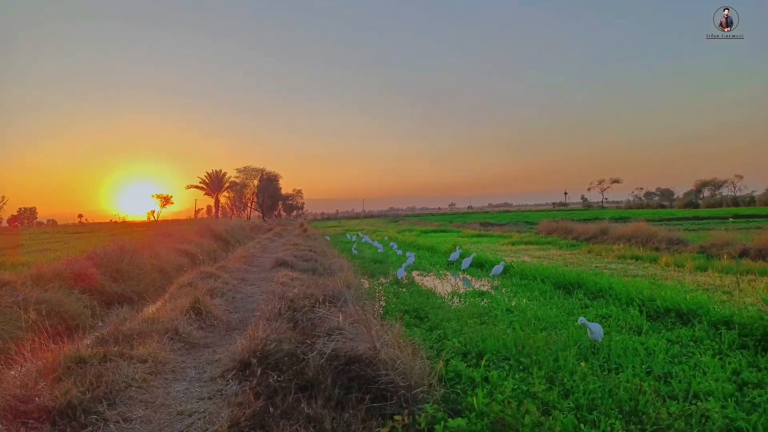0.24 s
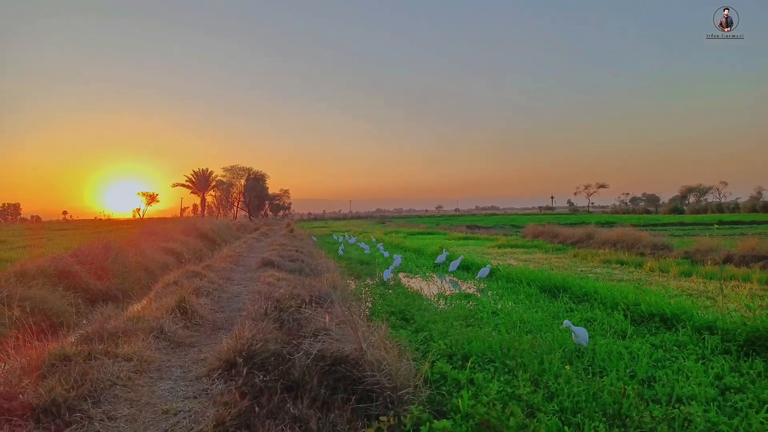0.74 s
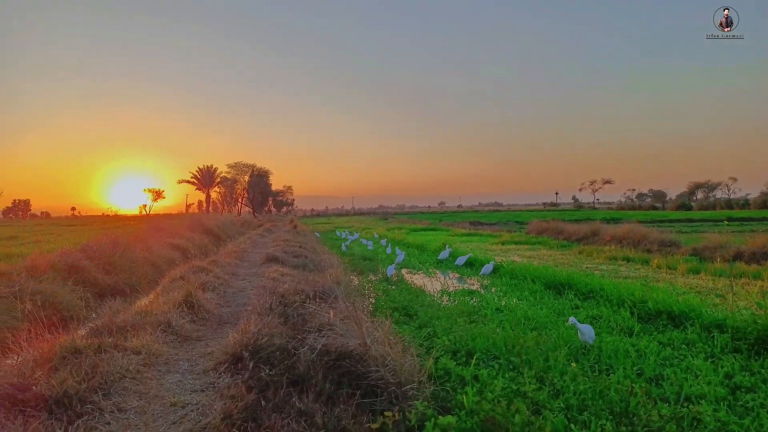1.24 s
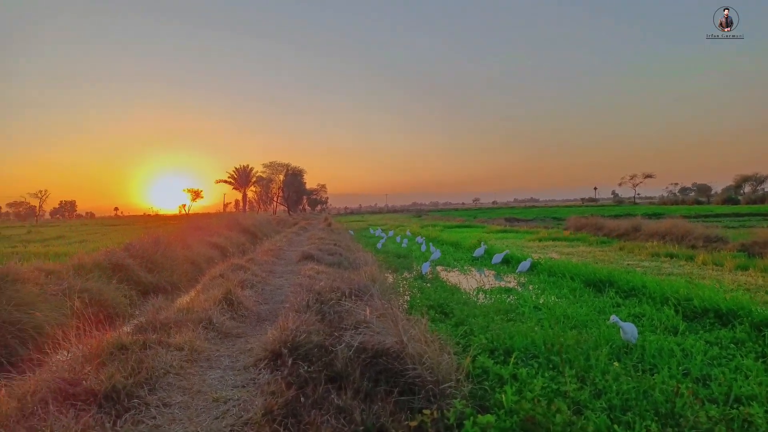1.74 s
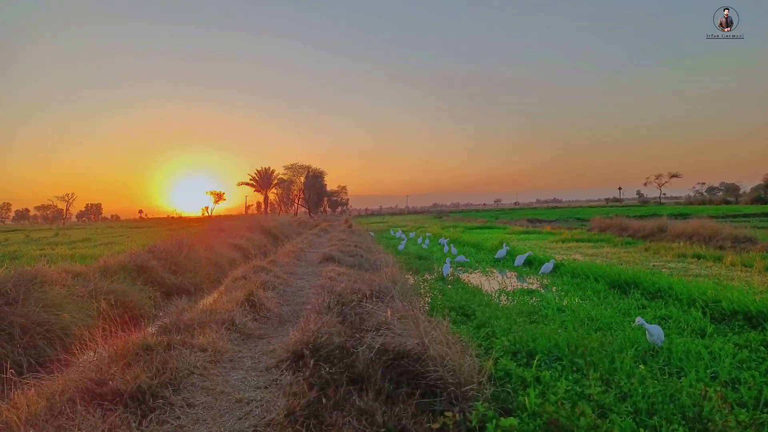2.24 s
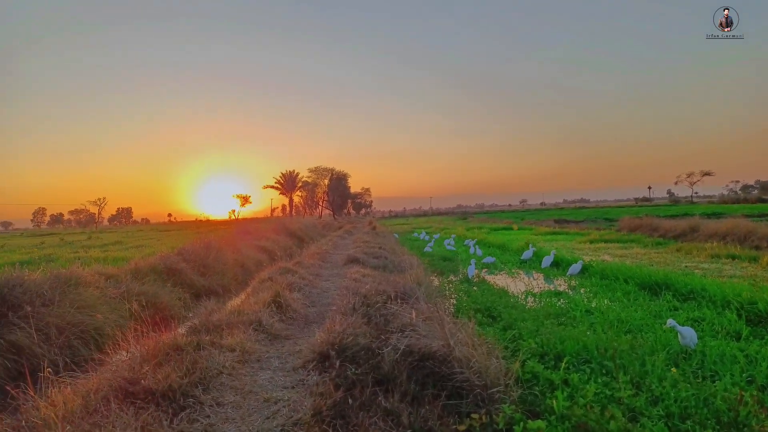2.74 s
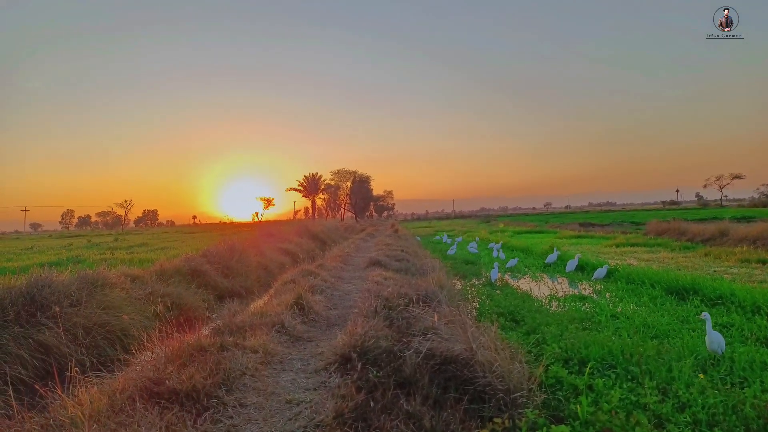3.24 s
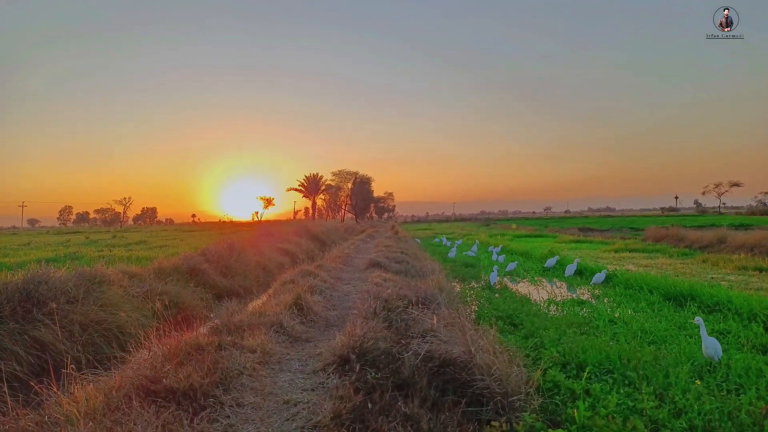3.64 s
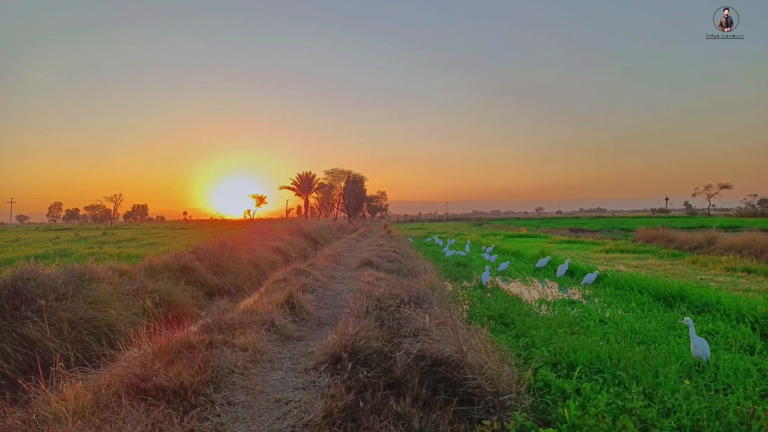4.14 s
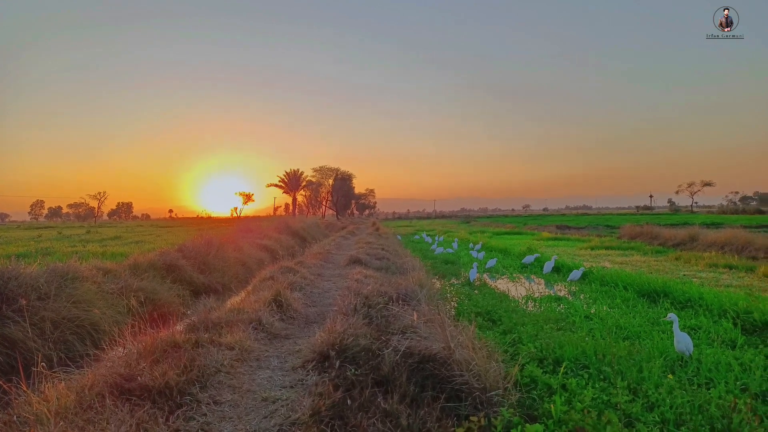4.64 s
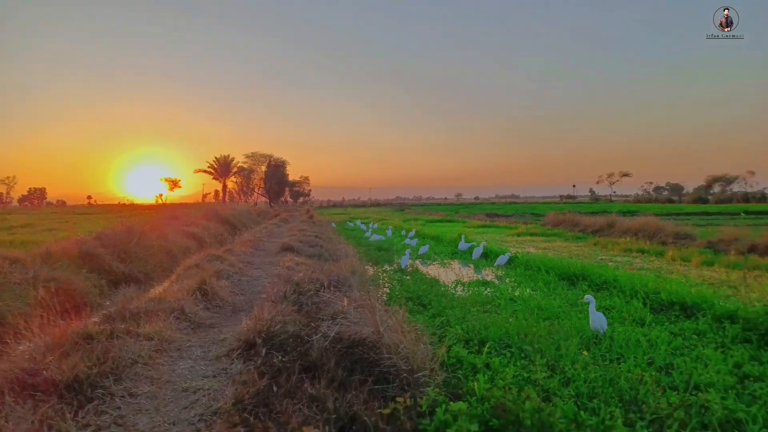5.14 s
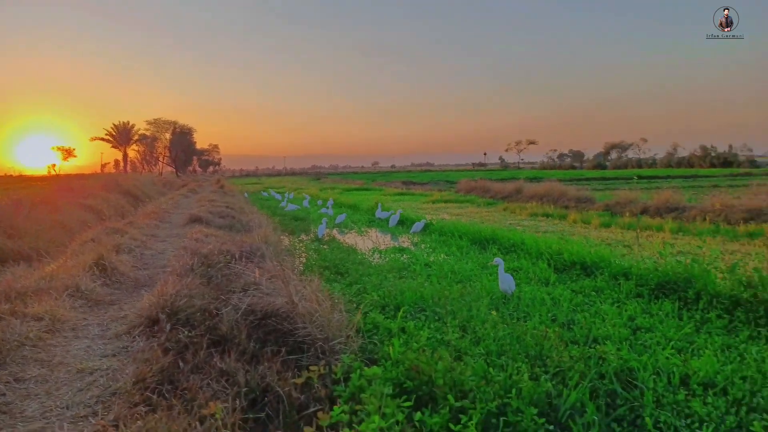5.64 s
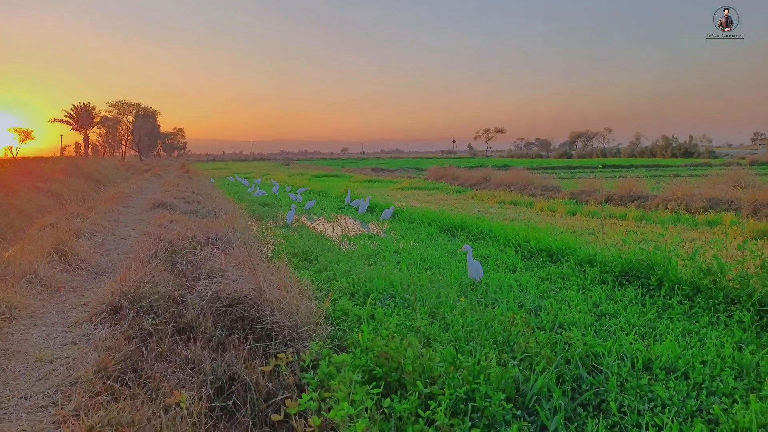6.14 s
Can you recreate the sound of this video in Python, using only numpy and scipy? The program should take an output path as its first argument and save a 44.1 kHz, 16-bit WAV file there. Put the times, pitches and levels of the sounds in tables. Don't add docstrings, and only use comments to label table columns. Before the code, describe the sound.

From 0 s two single-cylinder diesel pump engines run continuously outdoors. The nearer fires about 7.8 times a second: short, bright bursts of gas around 2-4 kHz, each ringing pipe and tin cowl, with a slight low push and a brief metallic tail filling the gap. The other beats about 9 times a second, a dull low thump with small valve clacks, so the two rhythms slide past each other. Puffs vary; a strong one lands at 0.06 s, the sound skips for an instant at 1.13 s, one firing nearly misses at 1.36 s, and a very strong puff with a tin clank comes near 1.49 s. Loose tin rattles and pump rumble stay low beneath. From about 5 s the phone turns, the ring sinks and dulls, and gurgling water swells around 5.8 s. A barely audible grass swish passes at 6.1 s; engines continue to the end, about 6.4 s.

```python
import sys
import numpy as np
from scipy import signal
from scipy.fft import rfft, irfft, next_fast_len
from scipy.io import wavfile
from scipy.ndimage import uniform_filter1d

SR = 44100
rng = np.random.default_rng(int(sys.argv[2]) if len(sys.argv) > 2 else 0)


def undo_db(level):
    steps = np.asarray(level, float) / 20
    return 10 ** steps


def transcribe(u):
    v = np.clip(np.atleast_2d(u).T, -1, 1)
    q = np.round(v * 32767).astype(np.int16)
    wavfile.write(sys.argv[1], SR, q)


N = 280917

# pitch in Hz, width in Hz, level in dB.
COWL_MODES = [(1080, 360, -39), (1407, 110, -2.5), (1730, 32, 1), (1950, 40, 1.5), (2610, 56, 4),
              (2870, 280, -15.5), (3840, 810, -12.5), (4400, 61, -52), (5470, 63, -14), (6400, 71, -53)]
# time in seconds, water level in dB, left minus right in dB.
PHONE_PATH = [(0, -87, 3.5), (.5, -77, 2.5), (1.402, -80, 4.5), (2.199, -87.5, 3.5), (2.899, -72, 4.5),
              (3.6, -83.5, 6), (4.3, -75.5, 6), (5, -79, 1), (5.4, -74, 4), (5.6, -66.5, 3.5),
              (5.802, -56, 1.5), (6.25, -65, -2), (6.5, -64, -0.5)]


def near_engine():
    bright, low, t = np.zeros((2, N)), np.zeros(N), np.arange(5120) / SR
    eddy_hz = np.arange(900, 9000, 220)
    for s, peak_db, ring_hz, upper_hz, treble_db, tail_db in firings():
        noise = rng.standard_normal((3, len(t)))
        eddies = np.c_[eddy_hz, 3.3 * rng.standard_normal(len(eddy_hz))]
        gas = gas_noise(noise, treble_db)
        blast = np.exp(-((t - .0093) / 0.0031) ** 2 / 2) + 0.27 * swell(t - .004, 0.0045, 0.0048)
        blast = blast * patchy(len(t), count=70, db=2.5)
        puff = exhaust_puff(gas, eddies, blast, ring_hz, upper_hz)
        tail = dull(0.04 * echo(t, gas, eddies) + 0.25 * cowl(t, ring_hz)) + panels(t)
        sound = 1.88 * puff + undo_db(tail_db) * tail + bare_jet(noise[1], blast, s)
        waver = int(2.2 * rng.standard_normal()) - 1
        sound[1] = np.roll(sound[1], waver)
        add(bright, s - .005, sound * undo_db(peak_db))
        push_db = 0.43 * (peak_db + 28.0) + 2.56 * rng.standard_normal()
        add(low, s - .005, exhaust_push(t) * undo_db(push_db))
    return bright, low


def firings():
    # firing number, time in seconds.
    near_beat = [(0, .0605), (3, .4468), (8, 1.0885), (9, 1.2303), (10, 1.3593), (11, 1.4918), (15, 2.0077),
                 (24, 3.161), (32, 4.1769), (34, 4.4271), (42, 5.449), (49, 6.3485)]
    # time in seconds, pitch in Hz.
    ring_path = [
        (0, 2697),
        (4.7, 2673),
        (5.2, 2366),
        (6.4, 2130),
    ]
    # time in seconds, peak in dB, pipe ring in Hz, treble share in dB.
    odd_firings = [(0.0612, -24, 2600, -14), (.1887, -33.5, 1685, -10.5), (0.3168, -27.5, 1874, -4),
                   (0.4458, -33, 2610, -0.5), (0.5731, -30.5, 2734, -8.5), (0.7012, -30, 2780, -13.5),
                   (0.8331, -35, 2750, -9), (1.0872, -31.5, 2800, -14), (1.2297, -30, 2900, -9.5),
                   (1.3579, -57, 1720, -14), (1.4906, -21.5, 2790, -4.5), (1.6195, -33, 2700, -3),
                   (1.7481, -27, 2756, -12.5), (2.0066, -26.5, 2500, -12), (2.2639, -27, 2850, -3.5),
                   (2.3902, -31.5, 2850, -7), (2.5196, -29.5, 2916, -28), (2.6478, -29.5, 2830, -12.5),
                   (2.7753, -30.5, 2056, -15), (3.2871, -28, 2574, -18), (4.1757, -25, 2600, -19),
                   (4.3007, -30.5, 1950, -17.5), (4.4268, -34, 2930, -20.5), (4.81, -32, 2190, -24),
                   (4.9366, -38.5, 3080, -8.5), (5.3223, -33.5, 2200, -9.5), (5.8324, -34, 2280, -16),
                   (5.9614, -27.5, 2160, -19), (6.219, -35, 2295, -7.5), (6.3488, -28.5, 2300, -10.5)]
    usual_db = -29
    times = beat_times(near_beat)
    chance = rng.standard_normal((5, len(times)))
    peak_db = usual_db + 0.38 * chance[0]
    ring_hz = np.interp(times, *np.transpose(ring_path)) * (1 + .03 * chance[1])
    upper_hz = 3564 * np.exp(0.14 * chance[2])
    treble_db = -15.5 + 4.5 * chance[3]
    rows = with_odd_beats(np.c_[times, peak_db, ring_hz, treble_db], odd_firings)
    s, peak_db, ring_hz, treble_db = rows.T
    tail_db = -4.5 - 0.61 * (peak_db - usual_db) + 1.9 * chance[4]
    return np.c_[s, peak_db, ring_hz, upper_hz, treble_db, tail_db]


def gas_noise(noise, treble_db):
    # frequency in Hz, level in dB per Hz.
    gas_colour = [(210, -70), (350, -38), (571, -63), (768, -14), (994, -19), (1540, -10.5), (1820, -6.5),
                  (2580, -3.5), (2970, -4), (3380, -8.5), (4260, -6), (5810, -12.5), (7610, -35),
                  (9890, -71), (16700, -120)]
    gas = colour(noise[0] + .25 * noise[1:], gas_colour)
    return gas + (undo_db(treble_db + 9.0) - 1) * band(gas, 6500, 4200)


def small_jet(x):
    return signal.sosfilt(signal.butter(5, [1100, 8300], "band", fs=SR, output="sos"), x)


def exhaust_puff(gas, eddies, blast, ring_hz, upper_hz):
    puff = small_jet(unit(colour(gas, eddies)) * blast)
    steep_top = signal.butter(8, 6620, fs=SR, output="sos")
    puff = signal.sosfilt(steep_top, puff) + undo_db(-21) * puff
    puff = puff + 2.44 * band(puff, ring_hz, 140) + 1.1 * band(puff, upper_hz, 400)
    loudest = np.sqrt(uniform_filter1d(puff[0] ** 2, size=220).max())
    return puff / (2.4 * loudest)


def echo(t, gas, eddies):
    after = unit(colour(band(gas, 4600, 1700), eddies * [1, -1])) * patchy(len(t), count=200, db=2.0)
    return small_jet(after * swell(t - .01, 0.0074, 0.03) * np.exp(-(t / 0.039) ** 4))


def cowl(t, ring_hz):
    modes = COWL_MODES + [(ring_hz, 120, -3)]
    shape = (len(modes), len(t))
    streams = rng.standard_normal(shape) * patchy(shape, count=250, db=7.5)
    streams = streams * swell(t - .008, 0.0057, 0.017)
    out = np.zeros(len(t))
    for (hz, width, db), stream, chance in zip(modes, streams, rng.standard_normal(len(modes))):
        out += undo_db(db + 3 * chance) * steep(stream, hz * (1 + .02 * chance), 3 * width)
    return out


def panels(t):
    # pitch in Hz, width in Hz, level in dB.
    panel_modes = [(1830, 51, -2), (3280, 140, -1), (3880, 120, -3), (5000, 84, -11.5), (5450, 90, -7),
                   (5900, 98, -14.5), (7340, 280, -26.5)]
    shape = (len(panel_modes), len(t))
    shakes = rng.standard_normal(shape) * patchy(shape, count=300, db=6)
    shakes = shakes * swell(t - .012, .005, .04) * np.minimum((t[-1] - t) / 0.016, 1)
    fits_db = 5 * rng.standard_normal(len(panel_modes))
    out = np.zeros(len(t))
    for (hz, width, db), fit_db, shake in zip(panel_modes, fits_db, shakes):
        out += undo_db(db + fit_db) * steep(shake, hz, width)
    return undo_db(-17) * out


def bare_jet(noise, blast, s):
    thin = steep(noise * blast, 11400, 1200) * (.3 + 4 * (s / 6) ** 8)
    return undo_db(-54) * (thin + .35 * steep(noise * blast ** 2, 12500, 5000))


def exhaust_push(t):
    chance = rng.standard_normal(3)
    push = undo_db(-59) * thud(t - .005, 68.8, 200 + 20 * chance[0], 0.032)
    push += undo_db(-62) * knock(t - .009, 287, 0.0035, 3 * chance[1])
    push += undo_db(-63.5) * knock(t - .052, 250.5, 0.0048, 3 * chance[2])
    return push


def far_engine():
    # pitch in Hz, width in Hz, level in dB.
    clack_modes = [(1444, 67, 8.5), (1669, 330, 10.5), (2600, 270, 1), (3700, 1100, -10), (4060, 450, -9),
                   (6500, 1500, -20), (7700, 1200, -26.5)]
    bright, low, t = np.zeros(N), np.zeros(N), np.arange(3500) / SR
    for s, thump_db, clack_db in thumps():
        chance = rng.standard_normal(3)
        body = thud(t, 88 + 5 * chance[0], 155.3, 0.031) * np.minimum(t / .008, 1)
        body += undo_db(-11.5 + 1.5 * chance[1]) * knock(t - .02, 153.8, 0.011, 3 * chance[2])
        add(low, s - .018, undo_db(thump_db - 4.0) * body)
        burst = rng.standard_normal(len(t)) * swell(t, 0.0036, 0.0064)
        clack = np.zeros(len(t))
        for hz, width, db in clack_modes:
            clack += undo_db(db + 8.7 * rng.standard_normal()) * steep(burst, hz, width)
        add(bright, s - .014, undo_db(clack_db + 7) * clack / np.abs(clack).max())
    return bright, low


def thumps():
    # firing number, thump crest in seconds.
    far_beat = [(0, .089), (1, .203), (9, 1.073), (10, 1.195), (25, 2.834), (39, 4.368), (45, 5.029),
                (50, 5.593), (57, 6.365)]
    # time in seconds, thump in dB, clack in dB.
    odd_thumps = [(.089, -55, -76.5), (0.207, -49.5, -47.5), (0.313, -47.5, -47), (0.526, -50.5, -51.5),
                  (0.725, -48.5, -48.5), (0.849, -48.5, -52), (0.974, -47, -57), (1.416, -48, -46.5),
                  (1.633, -42.5, -50.5), (1.962, -49, -43.5), (2.066, -50.5, -51.5), (2.181, -50, -49),
                  (2.29, -47.5, -57), (2.391, -50, -50.5), (3.059, -50.5, -56.5), (3.173, -46, -62.5),
                  (3.275, -48.5, -52), (3.602, -49.5, -51), (3.714, -46.5, -57), (3.821, -48, -43),
                  (3.928, -59.5, -44), (4.047, -50.5, -46.5), (4.256, -48, -52.5), (4.588, -50.5, -40.5),
                  (4.812, -49, -50), (5.255, -51, -56.5), (5.478, -43, -55.5), (5.597, -42, -40.5),
                  (6.143, -49, -49.5), (6.264, -47, -57.5)]
    times = beat_times(far_beat)
    levels_db = [-51, -57] + rng.standard_normal((len(times), 2)) * [1.1, 5]
    return with_odd_beats(np.c_[times, levels_db], odd_thumps)


def boom():
    return undo_db(-41.5) * knock(np.arange(N) / SR - .207, 81.5, 0.01, 0)


def rattle():
    out, t = np.zeros(N), np.arange(900) / SR
    scrapes_per_s, typical_db = 100, -53
    for when, which, size, length in rng.random((int(scrapes_per_s * N / SR), 4)):
        hz, _, db = COWL_MODES[1 + int(which * 8)]
        scrape = rng.standard_normal(len(t)) * swell(t, 0.00022, 0.0005 + 0.0013 * length)
        level_db = typical_db + db / 2 - 4.0 * np.log(size)
        add(out, when * N / SR, undo_db(level_db) * steep(scrape, hz, 230))
    return out


def ticks():
    # start in seconds, peak in dB, ring in Hz, length in seconds.
    tick_list = [(.002, -57.5, 1780, 0.0069), (0.082, -49.5, 1685, 0.01), (1.4417, -41.5, 1640, 0.0039),
                 (1.484, -33.5, 1080, 0.0083), (1.487, -51, 7920, 0.0028), (1.402, -65, 7240, 0.0014),
                 (1.903, -51, 5730, 0.0077), (2.1556, -42.5, 2630, 0.0066), (2.4595, -45, 1524, 0.0036),
                 (2.485, -55, 2620, 0.0021), (2.545, -44, 1647, 0.0088), (3.135, -58, 3370, 0.00082),
                 (3.644, -44.5, 3950, .003), (3.69, -48, 1352, 0.0056), (5.41, -45.5, 5370, 0.0017),
                 (5.416, -55, 4340, 0.0016)]
    out, t = np.zeros(N), np.arange(2500) / SR
    for s, peak_db, hz, length in tick_list:
        ring = steep(rng.standard_normal(len(t)) * swell(t, 0.0017, length), hz, 0.5 / length)
        add(out, s - .001, undo_db(peak_db) * ring / np.abs(ring).max())
    return out


def water():
    # pitch in Hz, width in Hz, level in dB, seconds by which the band swells ahead.
    gurgles = [(1803, 120, -7, -0.12), (2152, 170, -2, -0.0083), (3430, 540, -8.5, 0.18),
               (4300, 760, -10.5, 0.083), (5260, 290, -9, 0.34), (5700, 350, -18, -0.3)]
    s, flow_db, _ = np.transpose(PHONE_PATH)
    t, out = np.arange(N) / SR, np.zeros(N)
    for hz, width, db, ahead in gurgles:
        level_db = np.interp(t + ahead, s, flow_db) + db + 2.2 * walk(4.18) + 3.6 * walk(45)
        out += undo_db(level_db) * unit(steep(rng.standard_normal(N), hz, width))
    return out


def field():
    # frequency in Hz, level in dB per Hz.
    rumble_colour = [(12, -52), (20, -7), (96, 12), (202, 0.5), (265, 5), (426, -20.5), (700, -6.5),
                     (1090, -8.5), (1710, -14.5), (2310, -35), (2610, -20.5), (3350, -15.5), (4860, -31),
                     (5930, -32.5), (7610, -44.5), (9890, -99), (16700, -120)]
    mid, side = rng.standard_normal((2, N))
    side = side - band(side, 70, 780)
    return unit(colour(mid + side * np.array([[1], [-1]]), rumble_colour)) * undo_db(-72 + 2.0 * walk(16))


def swish():
    start_s, end_s = 6.09, 6.23
    t = np.arange(int((end_s - start_s) * SR)) / SR
    rise = t / t[-1]
    noise = rng.standard_normal((2, len(t)))
    hiss = (1 - rise) * steep(noise, 13000, 1200) + 1.3 * rise ** 2 * steep(noise, 14200, 2000)
    out = np.zeros((2, N))
    add(out, start_s, undo_db(-87) * unit(hiss) * np.sin(np.pi * rise) ** .5)
    return out


def dull(x):
    return signal.sosfilt(signal.butter(10, 6900, fs=SR, output="sos"), x)


def ports(x):
    # frequency in Hz, lead of the left port in radians.
    port_lead = [(0, 0), (340, -0.4), (1290, 4.6), (1720, 2.2), (2070, -1.0), (2330, -5.1), (2840, -9.2),
                 (3190, -7.6), (3620, -9.3), (3960, -8.9), (4910, -10.6), (5510, -9.8), (6630, -12.2),
                 (7320, -10.8)]
    # frequency in Hz, left minus right in dB.
    body_shadow = [(60, 1.0), (100, 1.0), (170, 1.0), (300, 2.0), (500, 2.0), (850, 0.5), (1450, 4.5),
                   (2470, 2.0), (4210, 2.0), (7160, 2.5)]
    hz, lead = np.transpose(port_lead)
    n = next_fast_len(N, True)
    turn = np.interp(np.fft.rfftfreq(n, 1 / SR), hz, lead)
    delayed = irfft(rfft(x[1], n) * np.exp(-1j * turn), n)[:N]
    right = colour(delayed, [(f, 2.5 - db) for f, db in body_shadow])
    s, _, left_over_right_db = np.transpose(PHONE_PATH)
    pan_db = np.interp(np.arange(N) / SR, s, left_over_right_db)
    return np.array([x[0] * undo_db(pan_db / 2), right * undo_db(-pan_db / 2)])


def beat_times(beat):
    number, s = np.transpose(beat)
    return np.interp(np.arange(number[-1] + 1), number, s)


def with_odd_beats(rows, odd):
    times = rows[:, 0].copy()
    for row in odd:
        rows[np.argmin(np.abs(times - row[0]))] = row
    return rows


def unit(x):
    return x / np.sqrt(np.mean(x ** 2))


def band(x, hz, width):
    return signal.lfilter(*signal.iirpeak(hz, hz / width, fs=SR), x)


def steep(x, hz, width):
    return band(band(x, hz, width), hz, width)


def colour(x, points):
    hz, db = np.transpose(points)
    n = next_fast_len(x.shape[-1], True)
    f = np.fft.rfftfreq(n, 1 / SR) + 1
    gain = undo_db(np.interp(np.log(f), np.log(hz), db))
    return irfft(rfft(x, n) * gain, n)[..., :x.shape[-1]]


def walk(rate):
    k = int(SR / rate)
    held = np.repeat(rng.standard_normal(N // k + 1), k)
    return 1.84 * uniform_filter1d(uniform_filter1d(held, k), k)[:N]


def patchy(shape, count, db):
    wander = uniform_filter1d(uniform_filter1d(rng.standard_normal(shape), size=count), size=count)
    return undo_db(db * unit(wander))


def swell(t, rise, fall):
    t = np.maximum(t, 0)
    e = (1 - np.exp(-t / rise)) ** 2 * np.exp(-t / fall)
    return e / e.max()


def knock(t, hz, spread, turn):
    return np.exp(-(t / spread) ** 2 / 2) * np.cos(2 * np.pi * hz * t + turn)


def thud(t, hz, start_hz, length):
    t = np.maximum(t, 0)
    cycles = hz * t + (start_hz - hz) * 0.0065 * (1 - np.exp(-t / 0.004))
    return -np.sin(2 * np.pi * cycles) * np.exp(-(t / length) ** 3)


def add(out, s, x):
    i = int(round(s * SR))
    a, b = max(i, 0), min(i + x.shape[-1], N)
    out[..., a:b] += x[..., a - i:b - i]


def scene():
    puffs, pushes = near_engine()
    clacks, thuds = far_engine()
    rumble = pushes + thuds + boom()
    bass = np.array([rumble * undo_db(.7), np.roll(rumble, -13) * undo_db(-.9)])
    bright = puffs + dull(clacks + rattle() + water()) + ticks()
    return ports(bright) + bass + field() + swish()


def top_cut(x):
    return signal.sosfilt(signal.butter(12, 15400, fs=SR, output="sos"), x)


def record(dry):
    t = np.arange(N) / SR
    skip_start_s, skip_end_s = 1.127, 1.1415
    outside_s = np.maximum(skip_start_s - t, t - skip_end_s)
    gap = np.clip(outside_s / 0.00095, .03, 1)
    hiss = undo_db([[-89.8], [-92]]) * steep(rng.standard_normal((2, N)), 13500, 8000)
    mix = (dry + hiss) * gap
    return top_cut(mix)


dry = scene()
out = record(dry)
transcribe(out)
```